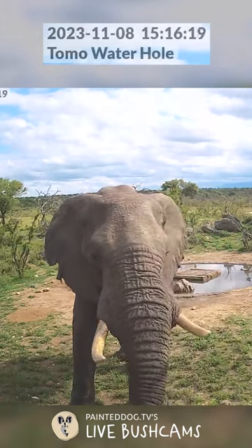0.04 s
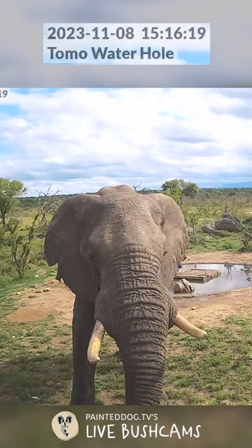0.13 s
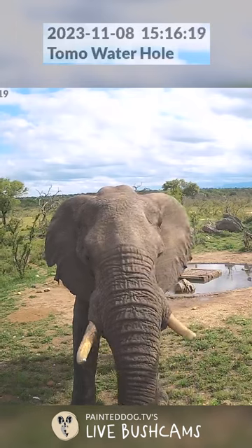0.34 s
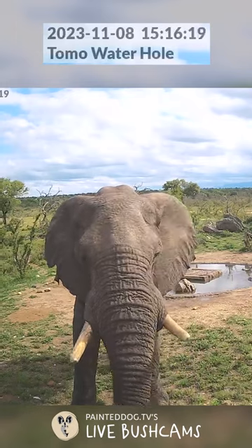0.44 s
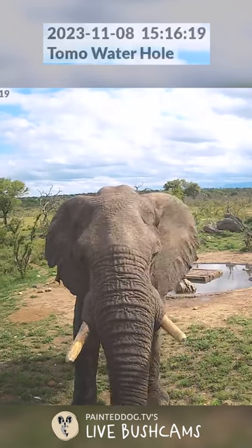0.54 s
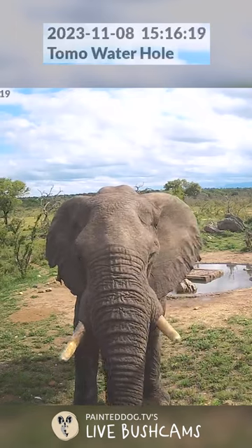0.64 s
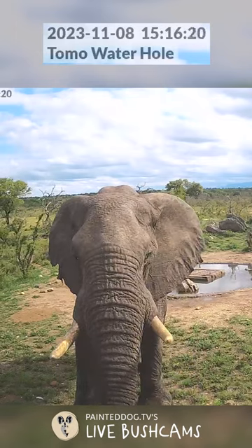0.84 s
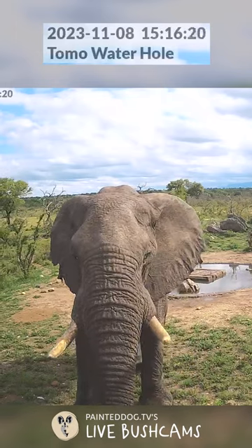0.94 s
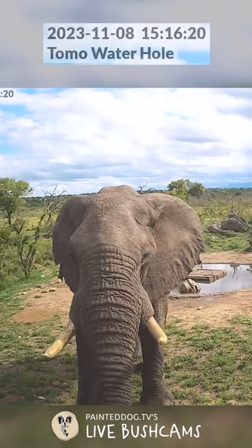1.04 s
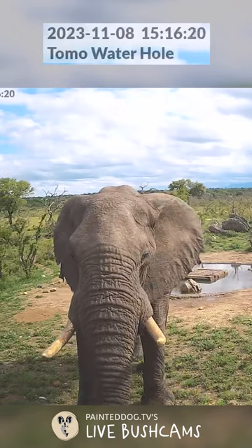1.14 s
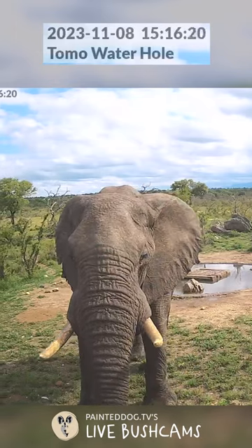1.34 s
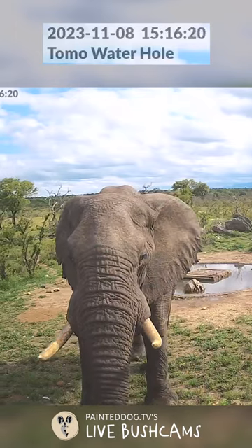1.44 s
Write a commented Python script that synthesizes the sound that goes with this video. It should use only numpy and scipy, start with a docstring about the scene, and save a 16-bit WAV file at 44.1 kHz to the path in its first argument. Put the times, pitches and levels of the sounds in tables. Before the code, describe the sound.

A nearby elephant makes dull thuds, perhaps with its ears. They start at 0.1 seconds and bunch into a fluttering rumble with a slight rasp, loudest from 0.3 to 0.4 seconds. Softer thuds follow, gathering again around 1.1 seconds. A steady breeze runs behind, with a wavering high hiss, faint ticking stalks and a slowly growing insect buzz. Distant birds give falling whistles near 0.5 and 1 second.

```python
"""At a water hole an elephant stands close by. Dull thuds, perhaps its ears, come singly and bunch into
one short fluttering rumble with a rasp at its height. Each thud is a heavily damped pressure swing;
many small ones overlap into a low churning between them. Behind, a breeze sounds in the bush (broadband
noise), a high hiss comes and goes, dry stalks tick, insects buzz (a pulsing band of noise) and far birds
give falling whistles (gliding tones, scattered by the bush)."""
import sys
import numpy as np
from scipy import signal
from scipy.fft import rfft, irfft
from scipy.io import wavfile
from scipy.ndimage import uniform_filter1d

SR = 44100
rng = np.random.default_rng(int(sys.argv[2]) if len(sys.argv) > 2 else 0)


def generate_wav(sig):
    """Save sig (samples, or channels by samples) to the path in sys.argv[1] as 16-bit PCM at SR."""
    pcm = np.round(np.clip(np.atleast_2d(sig).T, -1, 1) * 32767).astype(np.int16)
    wavfile.write(sys.argv[1], SR, pcm)


N = 66150

# Spectrum of the high hiss and the ticks: f/Hz, relative spectral level/dB
TREBLE_SPECTRUM = [(1500, -38), (3000, -1), (5000, -1.5), (9000, -1), (12000, -1), (15000, -3.5)]


def undb(db):
    """Amplitude ratio for a level in decibels."""
    return 10 ** (np.asarray(db) / 20)


def unit(x):
    """Normalisation to rms 1."""
    return x / np.sqrt(np.mean(x ** 2))


def envelope(t, points):
    """Amplitude along a curve of (t/s, level/dB) points."""
    return undb(np.interp(t, *np.array(points).T))


def noise(points):
    """Spectral shaping: noise of rms 1, coloured by (f/Hz, level/dB) points."""
    hz, db = np.array(points).T
    f = np.arange(N // 2 + 1) * SR / N
    gain = undb(np.interp(np.log(f + 1), np.log(hz), db))
    return unit(irfft(rfft(rng.standard_normal(N)) * gain, N))


def drift(steps_per_s):
    """Random modulation: smoothed random steps of rms 1."""
    k = int(SR / steps_per_s)
    steps = np.repeat(rng.standard_normal(N // k + 1), k)
    return unit(uniform_filter1d(uniform_filter1d(steps, k), k)[:N])


def around(t, at):
    """The samples within 30 ms of a moment."""
    return slice(*np.searchsorted(t, [at - .03, at + .03]))


def swing(t, hz, cycles):
    """Heavily damped oscillation: a sine under a lopsided Gaussian envelope around time 0."""
    turns = t * hz
    width = cycles * np.where(turns < 0, 0.93, 1.015)  # the rise is quicker than the fall
    return -np.sin(2 * np.pi * turns) * np.exp(-(turns / width) ** 2)


def breeze():
    """Flow noise: air in the bush gives a broad spectrum whose level wavers slightly."""
    # f/Hz, relative spectral level/dB
    air_spectrum = [(20, -10), (60, -10), (110, -8.5), (200, -12), (400, -9.5), (600, -9.5), (850, -9.5),
                    (1150, -6.5), (1900, -6.5), (2350, -13.5), (3200, -15.5), (4500, -19), (6500, -20),
                    (8500, -16), (10500, -26), (12500, -29.5), (15000, -43)]
    return noise(air_spectrum) * undb(-63 + 0.74 * drift(24.98))


def high_hiss(t):
    """Amplitude modulation: a high hiss swells and flickers, dropping away during the loudest thuds."""
    # t/s, level/dB
    hiss_levels = [(0, -72.5), (.18, -66), (.28, -79), (.5, -91), (.55, -72), (.6, -79), (.78, -75.5),
                   (.86, -73), (.89, -63.5), (1.0, -64.5), (1.15, -68.5), (1.22, -73), (1.42, -75),
                   (1.49, -63)]
    return noise(TREBLE_SPECTRUM) * envelope(t, hiss_levels) * undb(drift(250))


def stalks(t):
    """Transients: dry stalks tick in bright noise bursts with exponential flanks."""
    # t/s, peak level/dB
    tick_events = [(.548, -63), (.879, -60), (1.157, -62)]
    flank_s = 0.0039
    bursts = sum(undb(db) * np.exp(-np.abs(t - at) / flank_s) for at, db in tick_events)
    return noise(TREBLE_SPECTRUM) * bursts


def insects(t):
    """Periodic modulation of a narrow noise band is heard as the buzz of insects."""
    # t/s, level/dB
    buzz_levels = [(0, -84), (.4, -80.5), (.8, -77), (1.2, -75), (1.28, -73), (1.5, -71.5)]
    peak_hz, width_hz, pulse_hz = 7720, 570, 26
    band = [(peak_hz - 2 * width_hz, -50), (peak_hz - width_hz, -5), (peak_hz, 0),
            (peak_hz + 2 * width_hz, -8), (2 * peak_hz, -70)]
    throb_db = 2 * np.sin(2 * np.pi * pulse_hz * t)
    return noise(band) * envelope(t, buzz_levels) * undb(1.8 * drift(90.7) + throb_db)


def birds(t):
    """Frequency glide and scattering: far whistles fall, quickly at first, and echo in the bush."""
    # onset t/s, duration/s, start f/Hz, end f/Hz, midpoint level/dB, level change/dB
    whistle_events = [(.45, 0.18, 3350, 2263, -73.5, -4), (0.957, 0.13, 2390, 1982, -66.5, -5),
                      (0.962, .145, 3500, 2420, -67, -5)]
    ramp_s, echo_decay_s, echo_db = 0.027, 0.036, -5.5
    direct = np.zeros(N)
    for at, length, start_hz, end_hz, db, fade_db in whistle_events:
        progress = np.clip((t - at) / length, 0, 1)
        fall = (1 - np.exp(-progress)) / (1 - np.exp(-1))
        hz = (start_hz + (end_hz - start_hz) * fall) * (1 + 0.01315 * drift(120))
        gate = np.clip(np.minimum(t - at, at + length - t) / ramp_s, 0, 1)
        gain = undb(db + fade_db * (progress - .5) + 0.5 * drift(120))
        direct += gain * gate * np.sin(2 * np.pi * np.cumsum(hz) / SR)
    response = rng.standard_normal(N) * np.exp(-t / echo_decay_s)
    response /= np.sqrt(np.sum(response ** 2))
    return direct + undb(echo_db) * signal.fftconvolve(direct, response)[:N]


def churn(t):
    """Superposition: many small random swings merge, brighter when strong, over a little sub-bass."""
    # t/s, level/dB
    churn_levels = [(0, -62.5), (.03, -55), (.08, -59.5), (.125, -54.5), (.17, -61.5), (.2, -48),
                    (.27, -49.5), (.32, -45), (.38, -42.5), (.42, -52), (.445, -63), (.51, -57), (.56, -76),
                    (.63, -75), (.67, -64), (.71, -86), (.94, -87), (1.0, -61), (1.1, -55), (1.2, -63.5),
                    (1.3, -65.5), (1.37, -94)]
    # f/Hz, relative spectral level/dB
    sub_spectrum = [(15, -3), (30, -4.5), (55, 0.5), (90, 8), (150, -13), (300, -53)]
    swings_per_s, reference_db, reference_hz, top_hz = 260, -60, 182, 367
    scatter_octaves, octaves_per_db, scatter_db = 0.41, 0.06, 3.5
    strength = envelope(t, churn_levels) / undb(reference_db)
    sub_bass = undb(-7.5) * noise(sub_spectrum) * strength ** 0.68  # swells less than the churning
    swings = np.zeros(N)
    for k, (late, pitch, size) in enumerate(rng.standard_normal((600, 3))):
        at = (k + late / 2) / swings_per_s
        near = around(t, at)
        strength_db = 20 * np.log10(np.interp(at, t, strength))
        octaves = scatter_octaves * pitch + octaves_per_db * strength_db
        hz = min(reference_hz * 2 ** octaves, top_hz)
        swings[near] += undb(scatter_db * size) * swing(t[near] - at, hz, cycles=0.73)
    return undb(reference_db) * (unit(swings) * strength + sub_bass)


def rasp(t):
    """Gated noise: the hardest thuds rattle in Gaussian bursts a few milliseconds long."""
    # f/Hz, relative spectral level/dB
    rasp_spectrum = [(300, -18), (550, 3), (800, -3.5), (1200, -10), (1600, -41), (3000, -59)]
    # t/s, peak level/dB
    rasp_events = [(0.304, -53), (0.342, -47), (0.357, -49.5), (0.3655, -46), (0.393, -56.5)]
    half_width_s = 0.0043
    bursts = sum(undb(db) * np.exp(-((t - at) / half_width_s) ** 2) for at, db in rasp_events)
    return noise(rasp_spectrum) * bursts


def thuds(t):
    """Heavy damping makes each thud dull: one brief swing with a deeper body and a faint bright edge."""
    # t/s, level/dB, f/Hz, envelope half-width/cycles, relative edge level/dB
    thud_events = [(.1140, -36.5, 260, 0.58, -15), (0.1268, -40.5, 222, 0.99, -22),
                   (0.147, -42.5, 242, 0.66, -28), (.1920, -51, 195, .7, -22),
                   (0.2063, -37, 262, 0.33, -10), (0.2266, -36, 200, .5, -17), (0.244, -41, 248, 0.58, -27),
                   (0.2532, -44, 229, .7, -18), (.2700, -43.5, 272, .6, -13),
                   (0.2797, -42.5, 280, 0.81, -8), (.2870, -37, 213, 2.3, -34),
                   (0.2984, -24.5, 291, 0.69, -24), (.3051, -21.5, 350, 0.89, -23.5),
                   (0.3153, -26.5, 212, 0.54, -18), (.3210, -32.5, 238, 2.04, -19),
                   (0.3367, -22.5, 370, 0.64, -34), (0.3453, -26, 313, 0.67, -40),
                   (0.3537, -30, 312, 0.38, -45), (.3660, -24, 299, 0.84, -11),
                   (0.3873, -32, 258, 0.48, -22), (0.3974, -23.5, 270, 1.04, -19),
                   (0.4148, -38.5, 330, 0.5, -17), (0.4279, -29, 214, 1.08, -9.5),
                   (.4620, -45, 218, 0.4, -18), (0.4826, -38, 210, 0.57, -33),
                   (.5363, -39.5, 187, 0.62, -19), (0.5903, -47.5, 262, 0.65, -24),
                   (0.65, -61, 110, .5, -26), (0.673, -53, 141, 0.47, -20), (0.809, -55.5, 180, 0.46, -16),
                   (0.8574, -38, 198, 0.71, -21), (0.8677, -50.5, 245, 0.9, -12),
                   (0.9546, -35, 228, 0.63, -18), (0.9986, -48.5, 118, 0.48, -25),
                   (1.0221, -53, 193, 0.92, -30), (1.045, -50, 189, 1.2, -31),
                   (1.0753, -40, 284, 0.78, -17), (1.0845, -38.5, 292, 0.63, -22),
                   (1.0984, -32, 200, 0.49, -17), (1.1067, -47.5, 159, 0.44, -24),
                   (1.1474, -40, 179, 0.39, -26), (1.1595, -46, 163, 0.71, -16),
                   (1.2, -48.5, 127, 0.56, -23), (1.236, -54, 193, .6, -24), (1.3525, -54, 169, 0.76, -29)]
    pressure = np.zeros(N)
    for at, db, hz, cycles, edge_db in thud_events:
        near = around(t, at)
        lag = t[near] - at
        body = undb(-18.5) * swing(lag, 0.55 * hz, cycles=0.69)
        edge = undb(edge_db) * swing(lag, 2.06 * hz, cycles=1.02)
        pressure[near] += undb(db + 0.02) * (swing(lag, hz, cycles) + body + edge)
    low_cut = signal.butter(1, 51, "high", fs=SR, output="sos")
    return signal.sosfiltfilt(low_cut, pressure)


def scene():
    """Linear superposition: the near elephant and the background add in one channel."""
    t = np.arange(N) / SR
    elephant = thuds(t) + churn(t) + rasp(t)
    background = breeze() + high_hiss(t) + insects(t) + stalks(t) + birds(t)
    return (elephant + background)[None]


def record(dry):
    """Band limiting: a steep low-pass filter removes the highest treble."""
    top_hz = 15150
    return signal.sosfilt(signal.ellip(10, .2, 70, top_hz, fs=SR, output="sos"), dry)


dry = scene()
out = record(dry)
generate_wav(out)
```